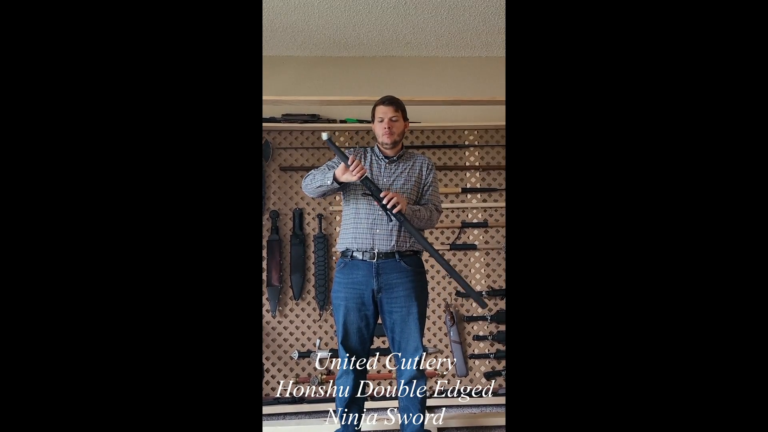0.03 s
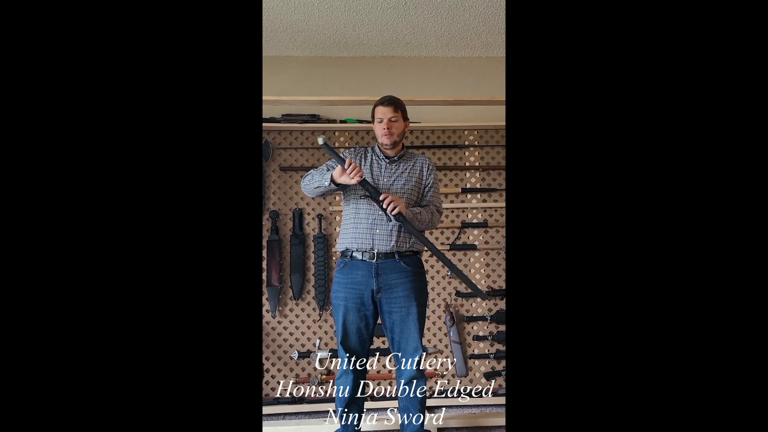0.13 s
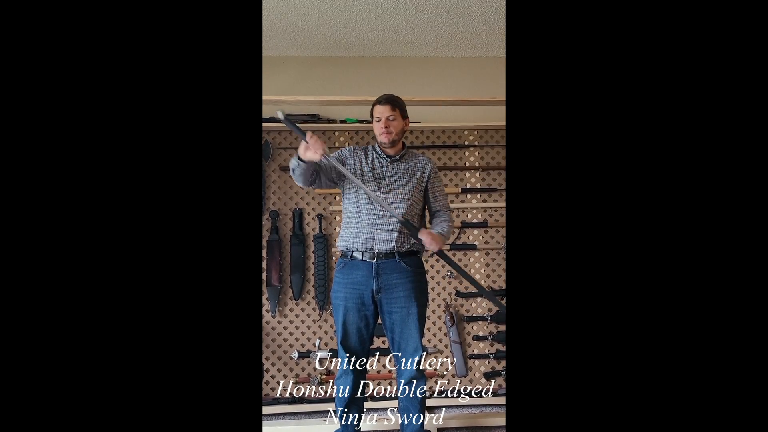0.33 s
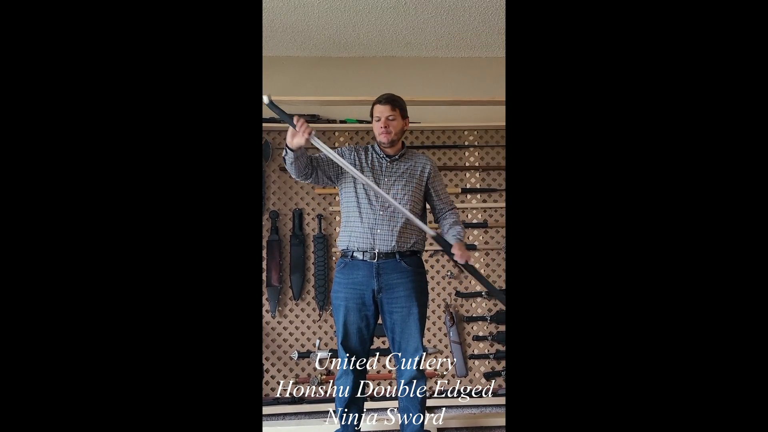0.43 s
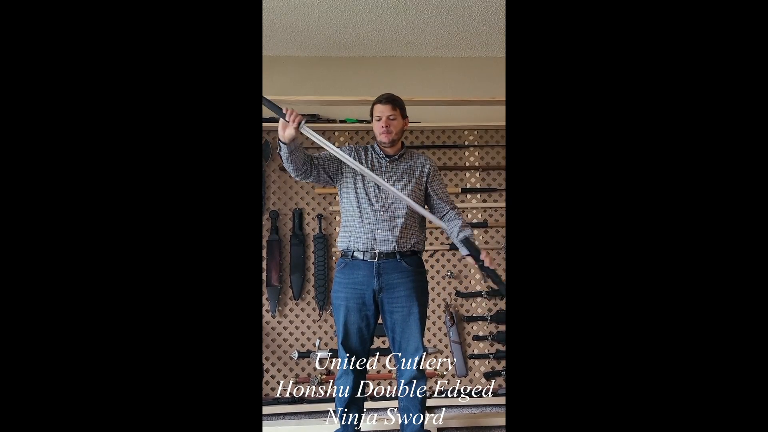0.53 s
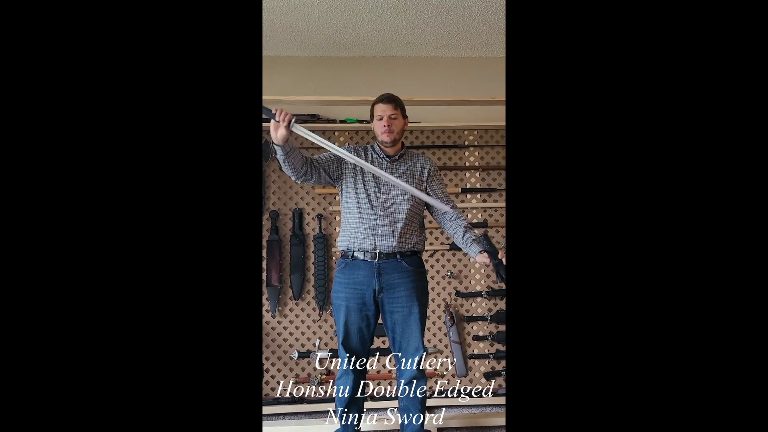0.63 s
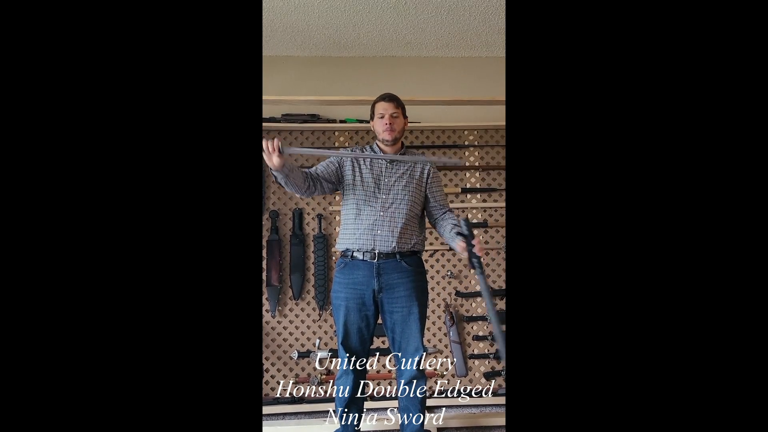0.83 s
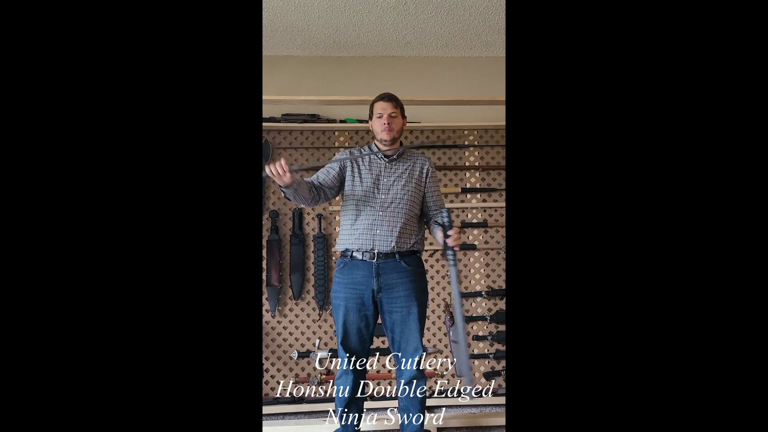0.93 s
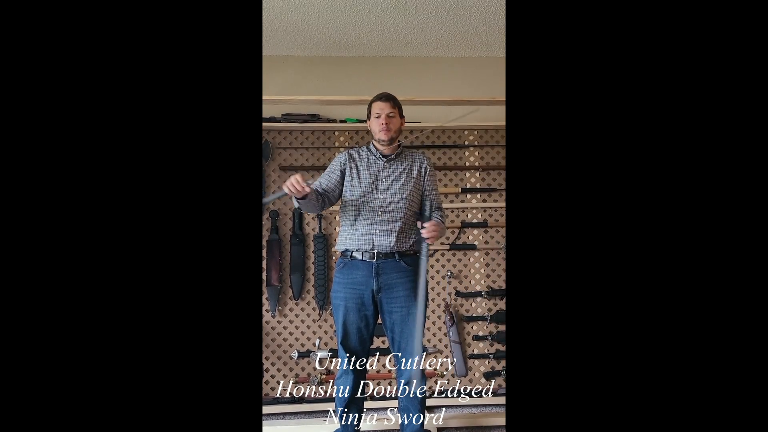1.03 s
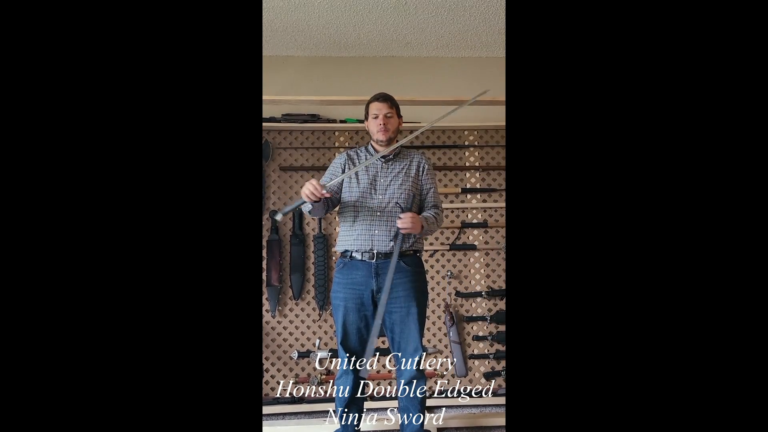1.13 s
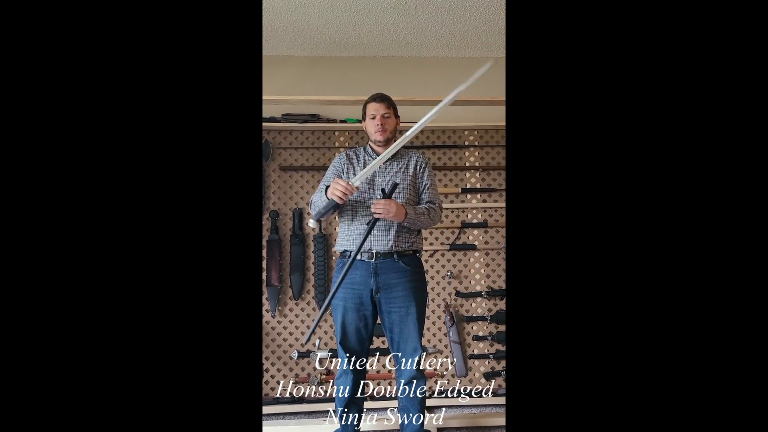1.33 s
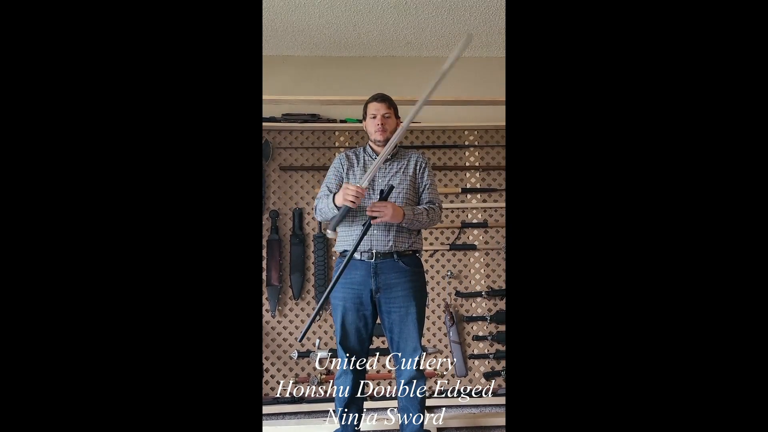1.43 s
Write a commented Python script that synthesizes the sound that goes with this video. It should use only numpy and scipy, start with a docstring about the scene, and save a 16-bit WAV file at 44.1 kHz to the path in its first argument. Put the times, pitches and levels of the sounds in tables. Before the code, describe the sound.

A sword is drawn from its scabbard with a brief metallic scrape and hollow clack.

```python
"""In a small room, a sword is drawn from its scabbard a few steps away.
The blade rasps through the scabbard's tight throat, pops free with a hollow clack and a dull bump,
slides on loosely and taps the rim as it leaves. Scrapes and knocks make the hollow scabbard ring.
Sleeves rustle faintly, the walls echo briefly, and a ventilation fan and mains hum drone underneath."""
import sys
import numpy as np
from scipy import signal
from scipy.fft import rfft, irfft
from scipy.io import wavfile
from scipy.ndimage import map_coordinates

SR = 44100
rng = np.random.default_rng(int(sys.argv[2]) if len(sys.argv) > 2 else 0)


def generate_wav(sig):
    """Save sig (samples, or channels by samples) to the path in sys.argv[1] as 16-bit PCM at SR."""
    pcm = np.round(np.clip(np.atleast_2d(sig).T, -1, 1) * 32767).astype(np.int16)
    wavfile.write(sys.argv[1], SR, pcm)


N = 66150
T = np.arange(N) / SR


def amp(db):
    """Turn decibels into a number to multiply by."""
    return 10 ** (np.asarray(db) / 20)


def unit(x):
    """Scale a sound to an average (rms) level of 1."""
    return x / np.sqrt(np.mean(x ** 2) + 1e-20)


def along(points, hz):
    """Read between the (pitch_hz, value) rows of a table, on a log pitch scale."""
    pitches, values = np.transpose(points)
    return np.interp(np.log(hz + 1), np.log(pitches + 1), values)


def wobble(turns_per_s):
    """A smooth random curve."""
    return map_coordinates(rng.standard_normal(256), [T * turns_per_s], mode="wrap")


def filtered(x, response):
    """Change the strength and timing of each pitch in x by response(hz)."""
    size = 2 * N
    return irfft(rfft(x, size) * response(np.fft.rfftfreq(size, 1 / SR)), size)[..., :N]


def causal(gain):
    """A filter with this gain that rings after a hit, never before it (minimum phase)."""
    cepstrum = irfft(np.log(np.maximum(gain, 1e-6)))
    half = len(cepstrum) // 2
    cepstrum[1:half] *= 2
    cepstrum[half + 1:] = 0
    return np.exp(rfft(cepstrum))


def delay(hz, delay_s):
    """A filter that only makes a sound later."""
    return np.exp(-2j * np.pi * hz * delay_s)


def ears(hz, lag_s):
    """Two delays that let the right ear hear lag_s after the left."""
    return np.array([delay(hz, -lag_s / 2), delay(hz, lag_s / 2)])


def pan(left_db):
    """Two gains that make the left side left_db louder than the right."""
    return amp(np.array([[.5], [-.5]]) * left_db)


def shaped_noise(colour):
    """Noise at level 1, coloured by (pitch_hz, level_db) rows."""
    return unit(filtered(rng.standard_normal(N), lambda hz: amp(along(colour, hz))))


def stereo_noise(likeness):
    """Hiss in two ears: likeness 1 is the same in both, 0 is unrelated."""
    angle = lambda hz: np.arccos(np.clip(along(likeness, hz), -1, 1)) / 2
    shares = lambda hz: np.array([np.cos(angle(hz)), np.sin(angle(hz))])
    mid, side = filtered(rng.standard_normal((2, N)), shares)
    return np.array([mid + side, mid - side])


def tone(hz, swing):
    """One pitch at level 1; swing bends its loudness and timing."""
    return unit(np.real((1 + swing) * np.exp(2j * np.pi * (hz * T + rng.random()))))


def drone():
    """A fan's low rush of air and wavering tones; its motor beats against the mains hum."""
    # colour of the rushing air: pitch_hz, level_db
    air_colour = [(20, -18.5), (35, -15.5), (55, 4), (88, 1), (150, -7), (280, -6.5), (430, -10),
                  (560, -17.5), (1000, -23), (1700, -27), (3000, -29), (4500, -37.5), (6800, -52),
                  (10000, -47), (15000, -45.5)]
    # how alike the air sounds in both ears: pitch_hz, likeness
    air_likeness = [(60, 0.92), (150, 1), (300, 0.57), (700, 0.91), (1500, 0), (5000, 0), (15000, 0)]
    # how much louder the air is on the left: pitch_hz, left_db
    air_balance = [(60, 1.5), (120, -10), (200, -9), (400, 0), (1300, -1), (2400, 1), (4400, 6),
                   (8000, 3.5), (15000, 4.5)]
    # mains and fan tones: pitch_hz, level_db, left_db, unsteadiness
    hum_tones = [(113.1, -67.5, -4, 0.24), (119.8, -66.5, 1, 0.72), (172.5, -66.5, 2, 0.067),
                 (223.7, -62, 7, 0.18), (268, -76.5, 0.5, 0.54), (343.5, -72, 0.5, 0.1),
                 (407.4, -77.5, -6, 0.25), (437.6, -81.5, 6, 1)]
    air_db, mains_db, mains_hz, wavers_per_s = -60.5, -61, 59.6, 9.2
    beat_hz, beat_depth, beat_peak_s = 5.1, 0.85, 0.13
    air_filter = lambda hz: amp(along(air_colour, hz)) * pan(along(air_balance, hz))
    air = unit(filtered(stereo_noise(air_likeness), air_filter))
    beat = beat_depth * np.exp(-2j * np.pi * beat_hz * (T - beat_peak_s))
    sound = amp(air_db) * air + amp(mains_db) * tone(mains_hz, beat)
    for pitch_hz, level_db, left_db, unsteadiness in hum_tones:
        waver = unsteadiness * (wobble(wavers_per_s) + 1j * wobble(wavers_per_s))
        sound = sound + amp(level_db) * pan(left_db) * tone(pitch_hz, waver)
    return filtered(sound, lambda hz: ears(hz, lag_s=.00027))


def scatter(x):
    """Echoes off the shelves and a short tail, new for each sound because the sword moves."""
    # time the tail takes to fade by 60 dB: pitch_hz, fade_s
    fade_times = [(200, 0.65), (800, 0.49), (2500, 0.43), (6000, 0.34), (14000, .33)]
    # how alike the echoes sound in both ears: pitch_hz, likeness
    echo_likeness = [(100, .9), (300, 0.54), (650, 0.35), (1400, .1), (15000, 0.2)]
    early_db, early_fade_s, tail_db, rise_s = 4.5, 0.05, 0.5, 0.0036
    t = T[:SR // 2]
    noise = stereo_noise(echo_likeness)[:, :len(t)]
    hz, frame_s, bands = signal.stft(noise, SR, nperseg=256)
    fading = bands * amp(-60 * frame_s / along(fade_times, hz)[:, None])
    tail = signal.istft(fading, SR, nperseg=256)[1][:, :len(t)]
    early = noise[:, ::-1] * amp(-60 * t / early_fade_s)
    rise = 1 - np.exp(-(t / rise_s) ** 2)
    echoes = (amp(tail_db) * unit(tail * rise) + amp(early_db) * unit(early * rise)) / np.sqrt(len(t))
    return signal.fftconvolve(x[None], echoes, axes=1)[:, :N]


def room(sounds):
    """Sounds arrive directly, off the walls and scattered; high pitches lean to the left."""
    # bounces off nearby walls, floor and ceiling: delay_s, gain, right_ear_lag_s
    bounces = [(.0017, 0.63, 0.0017), (.0037, .35, -0.013), (.0052, 0.62, -.0003), (.0068, 0.46, -.0002),
               (.0088, 0.75, -0.014), (.0101, 0.35, -.0002)]
    # how much louder the sword is on the left: pitch_hz, left_db
    sword_balance = [(200, -5), (700, 0), (1300, .7), (2400, 2), (4400, 5.5), (8000, 10), (15000, 6.5)]
    direct_db, walls_dull_above_hz = 3, 3900

    def paths(hz):
        direct = amp(direct_db) * pan(left_db=4.5) * ears(hz, lag_s=.00005)
        walls = sum(gain * delay(hz, delay_s) * ears(hz, lag_s) for delay_s, gain, lag_s in bounces)
        return direct + walls / (1 + 1j * hz / walls_dull_above_hz)

    heard = filtered(sum(sounds), paths) + sum(scatter(x) for x in sounds)
    return filtered(heard, lambda hz: pan(along(sword_balance, hz)))


def swell(peak_s, width_s):
    """A bell-shaped rise and fall in loudness."""
    return np.exp(-.5 * ((T - peak_s) / width_s) ** 2)


def rustle(gain_db=-2.5):
    """Soft swells of cloth noise as the arms move."""
    # sleeves and grip moving: peak_s, width_s, level_db
    moves = [(-0.01, 0.1, -77), (0.64, .06, -81.5), (0.902, 0.035, -84), (1.218, 0.029, -74.5),
             (1.404, 0.049, -88)]
    # colour of rubbing cloth: pitch_hz, level_db
    cloth_colour = [(200, -17), (700, 9), (1500, -9), (2800, 2.5), (4200, -15.5), (7000, -37), (15000, -28)]
    loudness = sum(amp(level_db) * swell(peak_s, width_s) for peak_s, width_s, level_db in moves)
    return amp(gain_db) * loudness * shaped_noise(cloth_colour)


def thud(level_db=-58.5):
    """The scabbard jolts in the hand with a dull bump as the blade comes free."""
    # colour of the bump: pitch_hz, level_db
    bump_colour = [(60, -39), (130, -17), (175, -20), (260, -7), (400, -17.5), (700, -21), (2000, -80)]
    return amp(level_db) * swell(peak_s=.288, width_s=.014) * shaped_noise(bump_colour)


def scabbard(hz, ring_db):
    """The hollow scabbard as a filter: it boosts its own notes and lets the rest through."""
    # notes the scabbard rings at: pitch_hz, level_db, width_hz
    notes = [(418, 1, 40), (669, 11, 14), (717, 7, 22), (770, 8, 26), (828, 5, 22), (974, 9, 24),
             (1216, 10, 16), (1295, 12, 22), (1346, 10, 16), (1451, 11, 24), (1900, 4, 30), (1955, 6, 22),
             (2020, 4, 22), (2080, 5, 22), (2200, 3, 40)]
    peaks = sum(amp(2 * (level_db + ring_db)) / (1 + (2 * (hz - pitch_hz) / width_hz) ** 2)
                for pitch_hz, level_db, width_hz in notes)
    return causal(np.sqrt(1 + peaks))


def scrape(gain_db=-3):
    """Many tiny slips of steel: thin while the throat grips and damps the lows, hollow once free."""
    # how loudly the blade rubs in the throat: time_s, level_db
    friction = [(.1, -88.5), (.19, -73.5), (.212, -67), (.221, -46.5), (.26, -53.5), (.29, -45),
                (.325, -51.5), (.352, -50), (.385, -63.5), (.425, -71), (.49, -64.5), (.53, -77),
                (.6, -100)]
    # colour of the rasp: pitch_hz, level_db
    rasp_colour = [(200, -14), (700, 6), (1400, 0), (2600, -2), (4000, -8), (5600, -14.5), (7300, -30.5),
                   (8600, -24), (11000, -22.5), (15500, -31.5)]
    slips_per_s, spread_db, thin_below_hz, release_s = 3500, 6, 830, 0.29
    slipping = rng.random(N) < slips_per_s / SR
    slips = slipping * amp(spread_db * rng.standard_normal(N)) * rng.choice([-1, 1], N)
    hollow_rasp = lambda hz: causal(amp(along(rasp_colour, hz))) * scabbard(hz, ring_db=-5)
    free = unit(filtered(slips, hollow_rasp))
    gripped = filtered(free, lambda hz: hz ** 2 / (hz ** 2 + thin_below_hz ** 2))
    loudness = amp(np.interp(T, *np.transpose(friction)) + gain_db)
    return np.where(T < release_s, gripped, free) * loudness


def knock(start_s, level_db, thin_below_hz, dull_above_hz, note_hz, note_db):
    """The blade hits once: a short, grating crack with its own note, which rings the scabbard."""
    # colour of the crack: pitch_hz, level_db
    crack_colour = [(100, -12.5), (400, -4.5), (720, -1), (1300, -2.5), (1600, -2.5), (2100, -1.5),
                    (2600, 1), (3300, -7), (4200, -15), (5400, -12), (7200, -30.5), (15000, 3)]
    gain_db, note_width_hz, grate_db, grate_fade_s = -4, 190, -12, 0.009

    def response(hz):
        edge_cut = np.sqrt((1 + (hz / dull_above_hz) ** 10) * (1 + (thin_below_hz / (hz + 1)) ** 4))
        crack = amp(along(crack_colour, hz)) / edge_cut
        note = np.sqrt(1 + amp(2 * note_db) / (1 + (2 * (hz - note_hz) / note_width_hz) ** 2) ** 2)
        return causal(crack * note) * scabbard(hz, ring_db=0) * delay(hz, start_s)

    grate = unit(rng.standard_normal(N) * amp(-60 * T / grate_fade_s)) / np.sqrt(N)
    blow = signal.unit_impulse(N) + amp(grate_db) * grate
    return amp(gain_db + level_db) * filtered(blow, response)


def scene():
    """The sword in the room, over the drone."""
    # blade hitting scabbard: start_s, level_db, thin_below_hz, dull_above_hz, note_hz, note_db
    hits = [(0.1448, -33, 1300, 2360, 1910, -3), (.152, -23.5, 1200, 2320, 1236, 3.5),
            (.218, -14.5, 1675, 4600, 3050, 8), (.227, -14.5, 1390, 3425, 1816, 10.5),
            (0.2647, 1.5, 470, 6220, 2010, 2), (0.2714, -3.5, 650, 2500, 1380, 7),
            (.352, -18.5, 596, 1650, 1280, 4), (0.4858, -16, 1930, 3100, 2920, 9),
            (0.492, -29.5, 1710, 2950, 2523, 16.5), (.498, -18.5, 590, 1570, 1374, 0)]
    knocks = [knock(*hit) for hit in hits]
    drawing = scrape() + thud() + rustle()
    return room(knocks + [drawing]) + drone()


def record(dry):
    """Cut away the very highest pitches."""
    top_hz = 15750
    return filtered(dry, lambda hz: hz < top_hz)


dry = scene()
out = record(dry)
generate_wav(out)
```